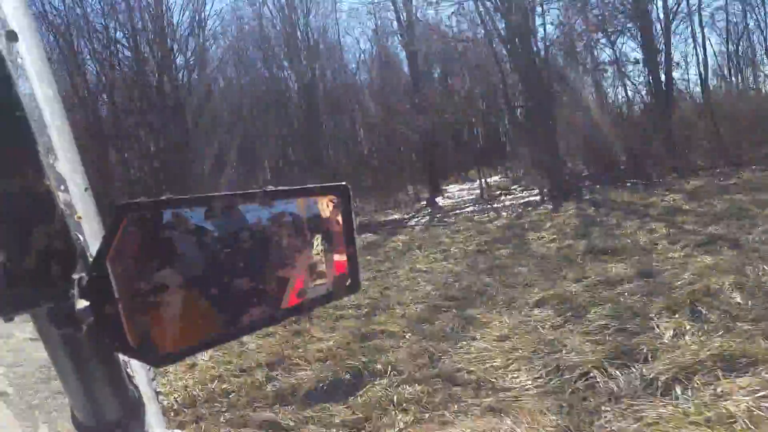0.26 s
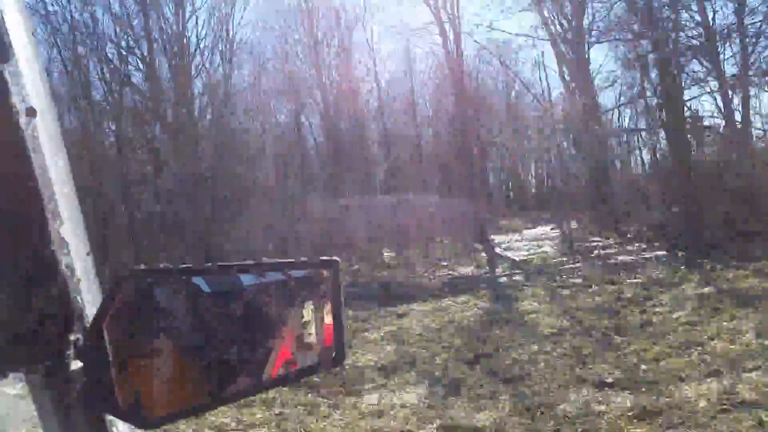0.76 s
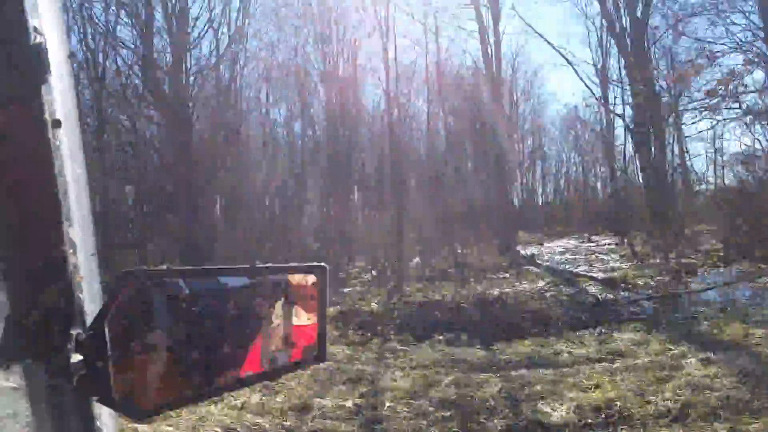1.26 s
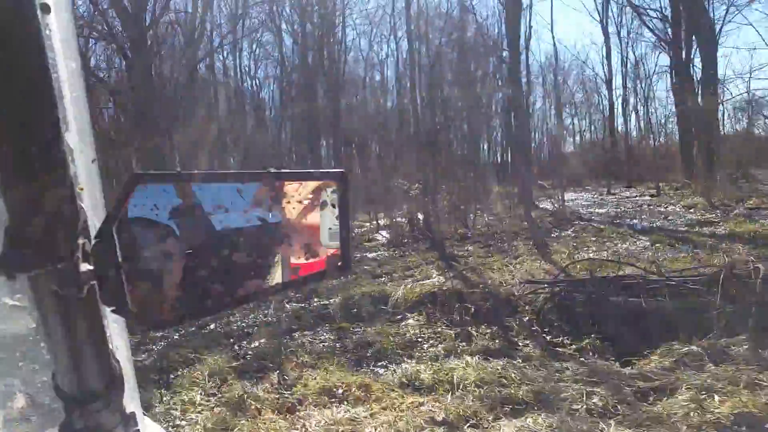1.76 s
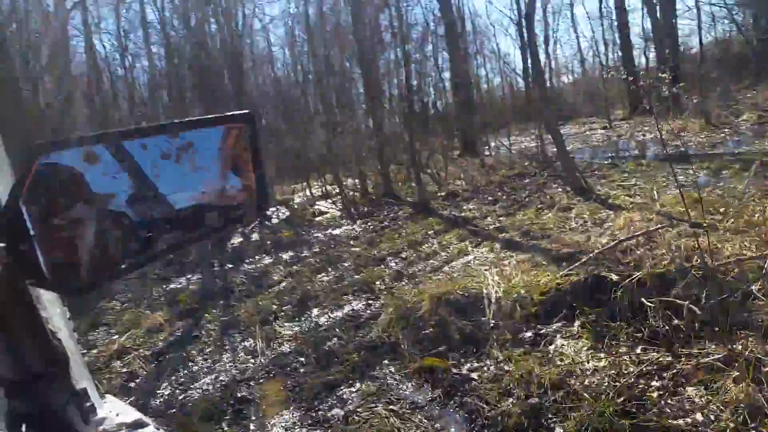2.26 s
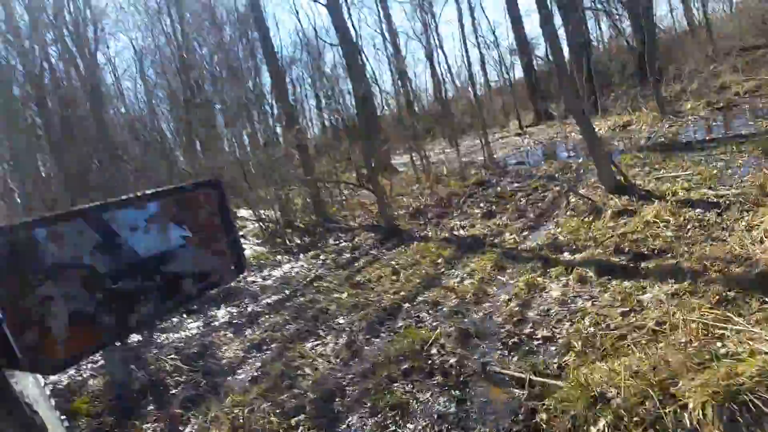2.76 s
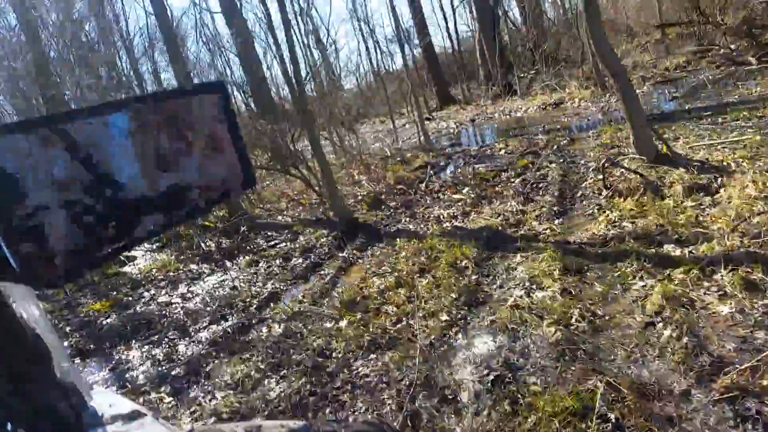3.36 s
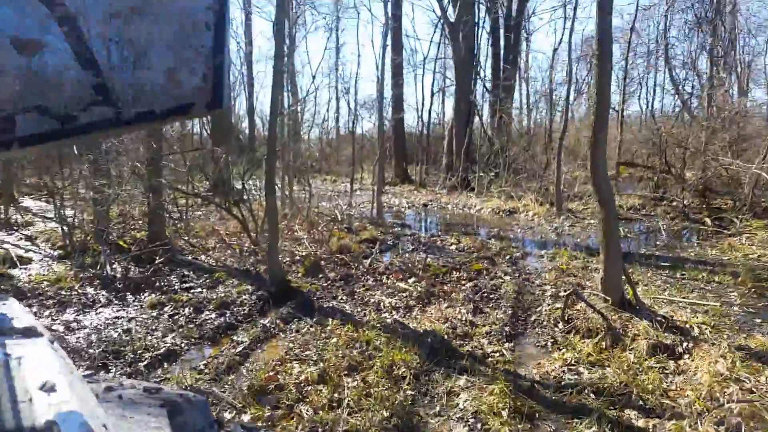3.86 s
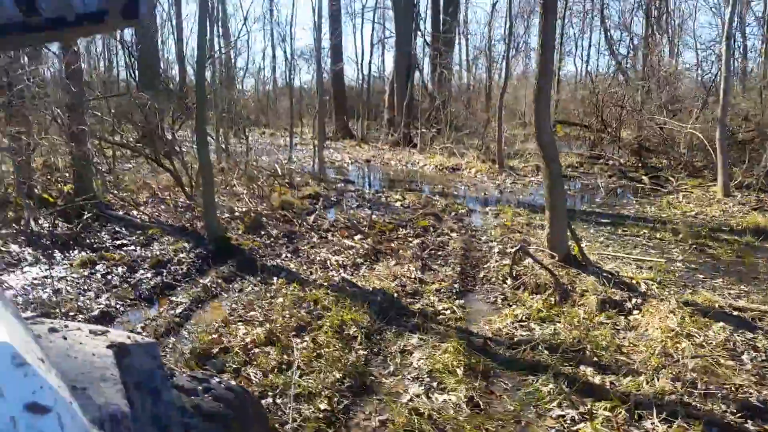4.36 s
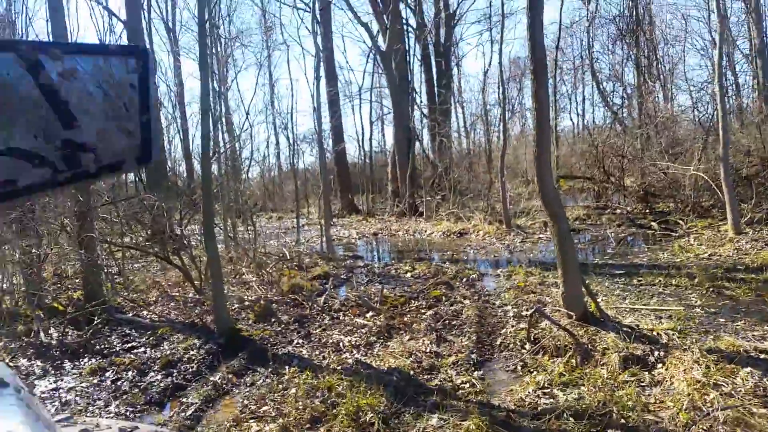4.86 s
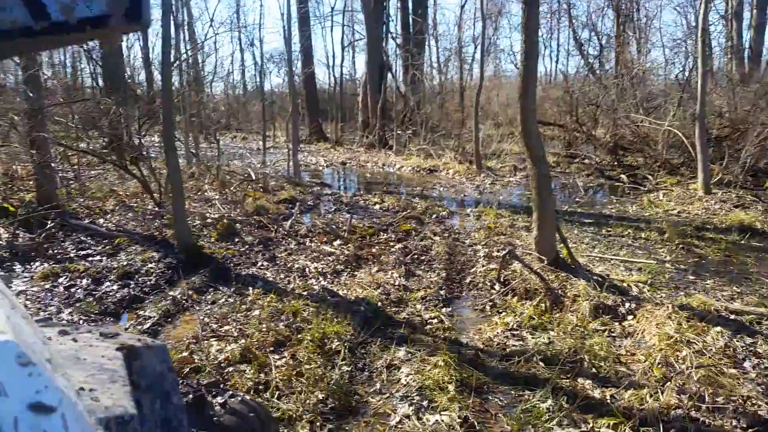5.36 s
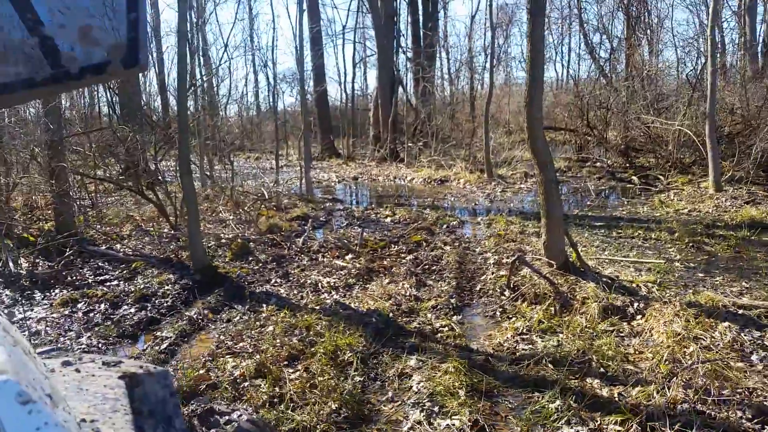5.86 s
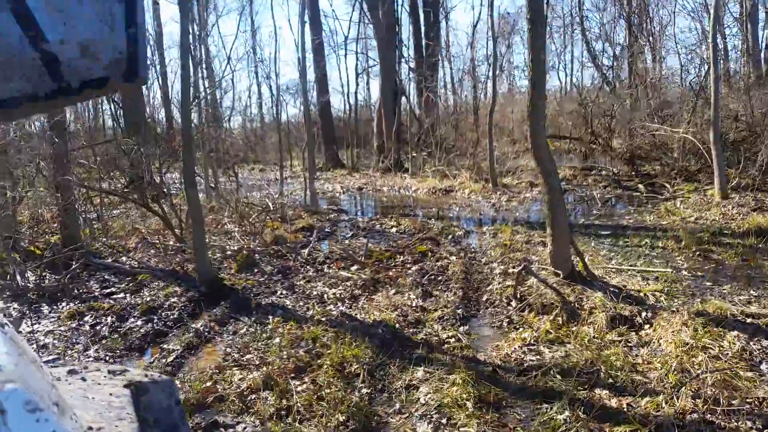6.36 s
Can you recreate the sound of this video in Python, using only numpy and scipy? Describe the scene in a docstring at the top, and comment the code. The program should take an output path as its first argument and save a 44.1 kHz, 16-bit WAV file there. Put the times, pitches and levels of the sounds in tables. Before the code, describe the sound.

Close on the left, an open buggy's large single-cylinder engine throbs deep and fast while dry stalks crackle under the tyres. Around three seconds it slows quickly, the frame knocks and wet leaves crunch, then it lopes at a lumpy idle. Two throttle blips come soon after, with a short belt squeal; it settles, quieter, and revs again at the end. Outdoors, microphone aboard the vehicle.

```python
"""A big single-cylinder engine lopes close by, to the left of the microphones, in an open off-road buggy.
The buggy crosses dry grass, slows into a muddy rut, idles and is blipped on the throttle.
Three pressure pulses a stroke apart, then a rest, ring the muffler; panels buzz and the drivetrain clatters.
Noise bursts crunch as tyres on stalks and wet leaves, ringing modes knock as the chassis,
and short tones sing as the drive belt and suspension."""
import sys
import numpy as np
from scipy import signal
from scipy.io import wavfile
from scipy.ndimage import uniform_filter1d

SR = 44100
rng = np.random.default_rng(int(sys.argv[2]) if len(sys.argv) > 2 else 0)


def wrap_up_sound(samples):
    """Save the sound to the file named by the first command line argument, as 16-bit audio."""
    columns = np.atleast_2d(samples).T
    # keep every value between -1 and 1, then stretch to whole-number steps
    tamed = np.clip(columns, -1, 1)
    steps = np.round(tamed * 32767).astype(np.int16)
    wavfile.write(sys.argv[1], SR, steps)


N = 292383

CRUISE_SPEED = 30  # four-stroke cycles per s
LOAD_RELEASE_S = .14  # load and surge both let go in this time


def from_db(db):
    """Decibels to gain."""
    return 10 ** (np.asarray(db) / 20)


def rms_one(x):
    """Scale to unit power."""
    return x / np.sqrt(np.mean(x ** 2) + 1e-20)


def in_time(rows):
    """Each column of a curve, read at every sample."""
    s, *columns = np.transpose(rows)
    return [np.interp(np.arange(N) / SR, s, column) for column in columns]


def at_hz(points, hz):
    """Read a spectrum on a log-frequency axis."""
    points = np.array(points)
    return np.interp(np.log(hz), np.log(points[:, 0]), points[:, 1])


def ramp(start_s, length_s):
    """Rises from 0 to 1 in a straight line."""
    return np.clip((np.arange(N) / SR - start_s) / length_s, 0, 1)


def drift(rate_hz):
    """Random wandering with a spread of about 1: low-passed noise."""
    step = 40  # samples between the computed points
    r = np.exp(-2 * np.pi * rate_hz * step / SR)
    white = rng.standard_normal(N // step + 2002)
    slow = signal.lfilter([1], [1, -2 * r, r * r], white)[2000:]  # skip the filter's start
    return np.interp(np.arange(N) / step, np.arange(len(slow)), rms_one(slow))


def butter(hz, kind, order=2):
    """A Butterworth filter in sections."""
    return signal.butter(order, hz, kind, fs=SR, output="sos")


def resonate(x, hz, width_hz, zeros=(1, 0, -1)):
    """A two-pole resonance; with zeros=(1,) it also passes all below it."""
    r = np.exp(-np.pi * width_hz / SR)
    poles = [1, -2 * r * np.cos(2 * np.pi * hz / SR), r * r]
    return signal.lfilter(np.array(zeros) * (1 - r * r) / 2, poles, x + 1e-18)


def fade(clicks, seconds):
    """Each click becomes an exponentially dying envelope."""
    return signal.lfilter([1], [1, -np.exp(-1 / (seconds * SR))], clicks + 1e-18)


def pan(left_db):
    """Left and right gains whose mean is 1."""
    gains = from_db([[left_db / 2], [-left_db / 2]])
    return gains / gains.mean()


def place(x, left_db, right_lag_ms):
    """A source on the left reaches the right microphone later and weaker."""
    n = np.arange(N)
    right = np.interp(n - right_lag_ms * SR / 1000, n, x)
    return pan(left_db) * np.array([x, right])


def coloured(white, colour, patchy_db, flicker_hz, count):
    """Stereo noise in bands, each with its own flicker and direction; neighbours take unrelated noise."""
    # left minus right: hz, left_db
    balance = [(60, -15), (200, 6), (370, 14.5), (1240, 10), (2280, 11.5), (4500, 10.5), (7650, 16),
               (10500, 12), (13000, 3.5)]
    # left-right likeness: hz, likeness (0-1)
    likeness = [(60, .95), (290, 0.34), (620, 0), (1350, 0.04), (14000, 0)]
    edges = np.geomspace(colour[0][0], min(colour[-1][0], SR / 2 - 1000), count + 1)
    out = 0
    for k, (low, high) in enumerate(zip(edges, edges[1:])):
        mid, side = signal.sosfilt(butter([low, high], "band"), white[k % 2])
        hz = np.sqrt(low * high)
        alike = np.clip(at_hz(likeness, hz), 0, 1)
        gain = from_db(at_hz(colour, hz) + patchy_db * drift(flicker_hz))
        stereo = np.sqrt(1 + alike) * mid + np.sqrt(1 - alike) * side * [[1], [-1]]
        out = out + gain * pan(at_hz(balance, hz)) * stereo
    return out / np.std(out.mean(axis=0))


def crankshaft():
    """Speed, and the surge (0-1) while it climbs: each blip rises, holds and coasts back, fast at first."""
    # the buggy slows from a cruise to idle: start_s, speed (four-stroke cycles per s)
    slowing = [(0.0, 31.897), (0.7, 30.941), (0.767, 32.607), (1.253, 31.282), (1.405, 29.602),
               (2.015, 29.033), (2.416, 26.447), (2.787, 25.935), (3.616, 12.281), (4.028, 10.333),
               (5.844, 11.179), (6.63, 9.525)]
    # throttle blips: start_s, rise_s, hold_s, speed gained (cycles per s)
    blips = [(4.179, 0.222, 0.021, 10.315), (4.542, 0.159, 0.207, 18.237), (6.226, 0.281, 0.2, 24.043)]
    coast_s, surge_build_s = .633, .09
    speed, = in_time(slowing)
    surge = 0
    for s, rise, hold, gained in blips:
        coasting = (1 - ramp(s + rise + hold, coast_s)) ** 2
        speed = speed + gained * ramp(s, rise) * coasting
        surge = surge + ramp(s, surge_build_s) * (1 - ramp(s + rise, LOAD_RELEASE_S))
    return speed, surge


def engine_load():
    """Each pull under load takes hold quickly and lets go more slowly."""
    # start_s, length_s, load (0-1)
    pulls = [(0.666, .62, 0.82), (4.657, .12, 0.38), (6.462, .25, 0.5)]
    attack_s = .04
    return sum(load * ramp(s, attack_s) * (1 - ramp(s + length, LOAD_RELEASE_S))
               for s, length, load in pulls)


def lull():
    """A level change in dB that sinks from the second blip on, then recovers."""
    deepest_s, fall_s, recover_s, depth_db = 5.504, 0.87, 0.36, -7
    return depth_db * (ramp(deepest_s - fall_s, fall_s) - ramp(deepest_s, recover_s))


def firings(turns, speed, uneven_db, idle_uneven_db, jitter_ms):
    """One click per pressure pulse, three a cycle; slow running burns less evenly."""
    # a piston stroke apart: place in the cycle (0-1), idle_db, running_db
    strokes = [(.379, -2, -6), (.622, 0, 0), (.866, -6, -11)]
    clicks, cycles, n = np.zeros(N), np.arange(int(turns[-1]) + 1), np.arange(N)
    for where, idle_db, running_db in strokes:
        early, strong = rng.standard_normal((2, len(cycles)))
        at = np.interp(cycles + where, turns, n, right=2 * N)
        slowness = (speed.min() / np.interp(at, n, speed)) ** 2
        at = at + early * slowness * jitter_ms * SR / 1000
        inside = at < N
        at = at[inside].astype(int)
        spread_db = uneven_db + idle_uneven_db * slowness[inside]
        strength_db = np.interp(speed[at], [14, 21], [idle_db, running_db])  # cycles per s
        clicks[at] = from_db(strength_db + spread_db * strong[inside])
    return clicks


def cycle_rms(x, turns):
    """The rms over one engine cycle; dividing by it keeps the throb inside the cycle."""
    energy, n = np.cumsum(x * x), np.arange(N)
    start, end = (np.interp(turns + half, turns, n) for half in (-.5, .5))
    power = (np.interp(end, n, energy) - np.interp(start, n, energy)) / (end - start)
    return np.sqrt(uniform_filter1d(power, size=1500) + 1e-30)


def rumble(speed, rumble_db):
    """The rolling body rumbles as low noise whose level follows engine speed."""
    # relative spectrum: hz, level_db per Hz
    rumble_colour = [(25, -13), (50, -50), (100, 14), (250, -9), (500, -69)]
    white = rng.standard_normal((2, 2, N))
    noise = coloured(white, rumble_colour, patchy_db=-4.5, flicker_hz=0.63, count=5)
    return from_db(rumble_db) * speed / speed.max() * noise


def tyres(bed_db, grain_db, lump_db, snap_db):
    """Countless stalks and wet leaves break under the tread in clumps; a few clumps stand out."""
    # grass and mud, relative level: start_s, level_db
    bed_curve = [(0.02, -46), (0.94, -43.5), (2.0, -45.5), (2.99, -40), (3.5, -31.5), (3.76, -40),
                 (4.55, -54.5), (4.88, -51.5), (5.13, -58), (5.3, -64), (5.52, -75), (6.6, -51.5)]
    # the loudest clumps of stalks snapping, relative peaks: start_s, peak_db
    loud_snaps = [(0.0772, -26), (0.1336, -38), (1.237, -31), (1.302, -26), (1.5848, -29), (2.0502, -35),
                  (2.1065, -26), (2.5496, -26), (2.5985, -36), (3.9419, -22.5), (4.06, -25.5),
                  (4.1929, -21), (4.7566, -27), (6.2751, -39)]
    # relative spectrum: hz, level_db per Hz
    tyre_colour = [(1500, -3), (3000, -7.5), (4500, -8), (6700, -3.5), (8200, -9.5), (10000, -4),
                   (11900, 2), (13000, 4.5), (14500, -26)]
    snap_s = 0.014
    # lesser snaps come at random; they stop growing where the bed turns to a wash
    snaps_per_s, lesser_db, lesser_spread_db, wash_db = 11, -6.5, 5.5, -44.5
    level_db, = in_time(bed_curve)
    born = rng.random(N) < snaps_per_s / SR
    snap_level_db = np.minimum(level_db, wash_db) + lesser_db
    snaps = born * from_db(snap_level_db + lesser_spread_db * rng.standard_normal(N))
    for s, db in loud_snaps:
        snaps[int(s * SR)] = from_db(db + snap_db)
    age = np.arange(SR // 5) / SR
    snap_shape = np.exp(-(age / snap_s) ** 2 / 2)
    bed = from_db(level_db + bed_db + lump_db * drift(16.7))
    crush = bed + signal.fftconvolve(snaps, snap_shape)[:N]
    grains = rng.standard_normal((2, 2, N)) * rms_one(from_db(grain_db * drift(900)))
    return crush * coloured(grains, tyre_colour, patchy_db=1.5, flicker_hz=34, count=16)


def ticks(decay_s, bright_hz):
    """Twigs and grit strike the bodywork: each a dry, bright crack of dying noise."""
    # relative strength: start_s, level_db
    grit = [(2.312, -35.5), (3.664, -27.5), (3.941, -38), (5.633, -49)]
    strikes = np.zeros(N)
    for s, db in grit:
        strikes[int(s * SR)] = from_db(db)
    crack = fade(strikes, decay_s) * rng.standard_normal(N)
    return 2 * signal.sosfilt(butter([900, min(bright_hz, SR / 3)], "band", order=1), crack)


def squeaks(waver):
    """Belt and suspension rubber slips and sings, each time on one unsteady pitch."""
    # levels before a random drift: start_s, length_s, pitch_hz, level_db
    slips = [(1.735, .03, 6000, -47), (2.175, .035, 6750, -49), (2.335, .035, 6150, -48),
             (2.74, .03, 10100, -47), (3.785, .045, 2450, -43), (4.775, .115, 1520, -36),
             (4.92, .07, 1535, -38.5), (5.14, .2, 2500, -60)]
    out, t = np.zeros(N), np.arange(N) / SR
    clock = np.cumsum(1 + waver * drift(65)) / SR
    for s, length, hz, db in slips:
        on = (t > s) & (t < s + length)
        swell = np.sqrt(np.sin(np.pi * (t[on] - s) / length))
        out[on] += from_db(db) * swell * np.sin(2 * np.pi * hz * clock[on])
    return out * from_db(1.5 * drift(30))


def chassis(knock_db, rattle):
    """A jolt and a short rattle set the frame's modes ringing."""
    # relative strength: start_s, peak_db
    knocks = [(3.235, -20), (3.333, -12.5), (4.303, -16.5), (4.335, -19), (4.75, -24)]
    # frame modes: pitch_hz, level_db, t60_s
    modes = [(345, -10, .07), (520, 1.5, .12), (575, -9, .09), (720, -12, .06), (950, -10, .06),
             (1220, -13, .05), (2050, -17, .03)]
    jolts = np.zeros(N)
    for s, db in knocks:
        jolts[int(s * SR)] = from_db(db + knock_db)
    jolts = jolts + rattle * fade(jolts, seconds=0.01) * rng.standard_normal(N)
    out = 0
    for hz, db, t60 in modes:
        r, w = from_db(-60 / (t60 * SR)), 2 * np.pi * hz / SR
        ring = signal.lfilter([0, np.sin(w)], [1, -2 * r * np.cos(w), r * r], jolts)
        out = out + from_db(db) * ring
    return out


def intake(clicks, speed, surge, rasp_db, low_hz, high_hz):
    """While the engine revs up, each gulp of air rasps, louder with speed."""
    gulps = rms_one(fade(fade(clicks, seconds=.004), seconds=.016))
    air = gulps * rng.standard_normal(N)
    rasp = rms_one(signal.sosfilt(butter([low_hz, high_hz], "band", order=3), air))
    return from_db(rasp_db) * surge * (speed / CRUISE_SPEED) ** 2 * rasp


def drone(turns, speed, load, drone_db, cab_hz, cab_width_hz, cab_db):
    """Engine orders growl under load and swell as they cross the cab's resonance."""
    # relative levels: order (multiple of the cycle rate), light_throttle_db, under_load_db
    orders = [(1, -39, -31), (2, -32, -30), (7, -38, -35), (8, -33, -41), (9, -47, -32), (10, -39, -39),
              (12, -42, -32), (13, -52, -43), (14, -44, -36), (16, -52, -46), (18, -51, -45),
              (20, -49, -44)]
    # hard acceleration makes the orders rough; full strain at 60 cycles per s, per s
    strain = np.clip(np.gradient(speed) * SR / 60, 0, 1)
    out = 0
    for order, light_db, open_db in orders:
        near = 1 / (1 + ((order * speed - cab_hz) / cab_width_hz) ** 2)
        level_db = light_db + np.clip(load, 0, 1) * (open_db - light_db)
        level_db = level_db + cab_db * near + 2 * drift(10)
        wobble = order * (.004 + .022 * strain) * drift(25)
        phase = order * turns + wobble + rng.random()
        out = out + from_db(level_db) * np.sin(2 * np.pi * phase)
    # shaking forces grow with the square of speed
    return from_db(drone_db) * (speed / CRUISE_SPEED) ** 2 * out


def drivetrain(clicks, throb, gain_db, uneven_db):
    """Valves, clutch and gears clatter unevenly, harder just after each firing."""
    # relative level: start_s, level_db
    clatter_curve = [(0.04, -42), (2.43, -43.5), (3.36, -38.5), (3.69, -43), (4.39, -39), (4.41, -42.5),
                     (4.68, -46.5), (4.77, -40), (5.39, -56), (6.21, -42.5), (6.53, -45.5), (6.6, -41.5)]
    # relative spectrum: hz, level_db per Hz
    clatter_colour = [(200, 10.5), (450, 7), (700, 0.5), (1000, 1.5), (1300, -6.5), (1800, -4.5),
                      (2500, -10), (3200, -16.5), (6000, -25), (8500, -66), (14000, -84)]
    level_db, = in_time(clatter_curve)
    beat = rms_one(1 + throb * fade(clicks, seconds=0.0035))
    white = rng.standard_normal((2, 2, N)) * beat
    noise = coloured(white, clatter_colour, patchy_db=2.0, flicker_hz=24.6, count=16)
    return from_db(level_db + gain_db + uneven_db * drift(7.4)) * noise


def panels(clicks, turns, buzz_db, rough):
    """Each firing, with a puff of turbulence, shakes the bodywork's resonances."""
    # relative levels: pitch_hz, width_hz, level_db
    resonances = [(235, 35, -8), (294, 20, -10), (384, 22, -7), (442, 10, 7.5), (520, 50, -9),
                  (610, 60, -8.5), (836, 18, -4), (965, 70, -16)]
    shake = clicks + rough * fade(clicks, seconds=0.0064) * rng.standard_normal(N)
    buzz = 0
    for k, (hz, width, db) in enumerate(resonances):
        buzz = buzz + (-1) ** k * from_db(db) * resonate(shake, hz, width)
    buzz = signal.sosfilt(butter(220, "high", order=4), buzz)
    return from_db(buzz_db) * buzz / cycle_rms(buzz, turns)


def exhaust(clicks, turns, level_db, load):
    """Gas pulses pass the muffler's chambers in series; load thins the boom and lifts the upper ring."""
    boom_load_db, ring_db, ring_load_db = -14.5, -0.5, 4
    gas = resonate(-clicks, hz=60, width_hz=25)
    gas = resonate(gas, hz=116, width_hz=72)
    gas = rms_one(resonate(gas, hz=146, width_hz=46, zeros=(1,)))
    gas = signal.sosfiltfilt(butter(215, "low", order=6), gas)
    gas = gas / cycle_rms(gas, turns)
    boom = signal.sosfiltfilt(butter(142, "low", order=8), gas)
    ring = gas - boom
    return from_db(level_db) * (from_db(boom_load_db * load) * boom
                                + from_db(ring_db + ring_load_db * load) * ring)


def scene():
    """One crankshaft drives every engine layer; the tyres work below."""
    speed, surge = crankshaft()
    load, lull_db = engine_load(), lull()
    turns, octaves = np.cumsum(speed) / SR, np.log2(speed / CRUISE_SPEED)
    clicks = firings(turns, speed, uneven_db=.55, idle_uneven_db=1.8, jitter_ms=.8)

    ground = rumble(speed, rumble_db=-28)
    ground = ground + tyres(bed_db=1, grain_db=1, lump_db=1.4, snap_db=-15.5)

    # levels at cruise, then per doubling of speed, by load and while revving up
    buzz_db = -41 - 0.5 * octaves + 4 * load - 1 * surge + 1.44 * lull_db
    exhaust_db = -11.5 + 3.5 * octaves + 3 * surge + lull_db

    body = ticks(decay_s=.005, bright_hz=8000) + squeaks(waver=.006)
    body = body + chassis(knock_db=-7, rattle=.012)
    body = body + intake(clicks, speed, surge, rasp_db=-37.5, low_hz=278, high_hz=650)
    body = body + drone(turns, speed, load, drone_db=-.5, cab_hz=294, cab_width_hz=10, cab_db=6.5)
    body = body + panels(clicks, turns, buzz_db, rough=0.06)
    body = place(body, left_db=8.0, right_lag_ms=0.31)

    clatter = drivetrain(clicks, throb=0.18, gain_db=5.5, uneven_db=1)
    engine = place(exhaust(clicks, turns, exhaust_db, load), left_db=5.3, right_lag_ms=.55)
    return ground + body + clatter + engine


def record(dry):
    """The highest peaks are rounded and the top is cut steeply."""
    cutoff_hz = 14650
    rounded = dry / (1 + (dry / .97) ** 8) ** (1 / 8)
    return signal.sosfilt(signal.ellip(10, .1, 80, cutoff_hz, fs=SR, output="sos"), rounded)


dry = scene()
out = record(dry)
wrap_up_sound(out)
```